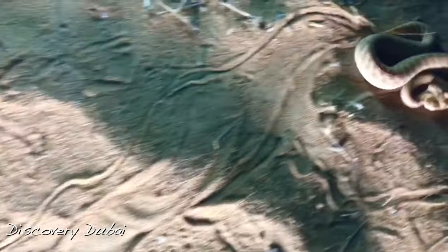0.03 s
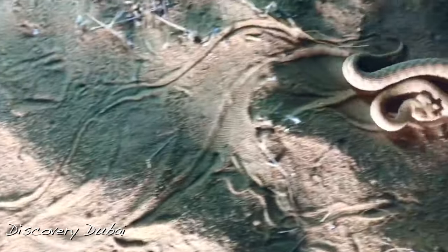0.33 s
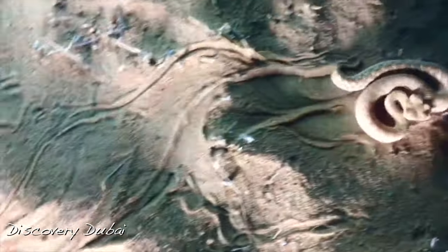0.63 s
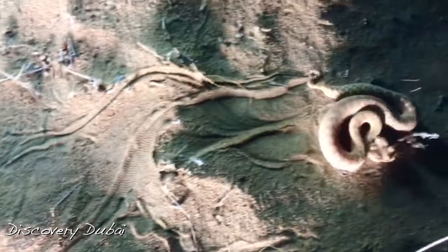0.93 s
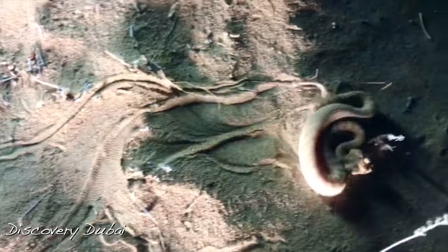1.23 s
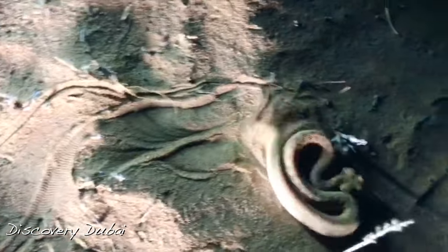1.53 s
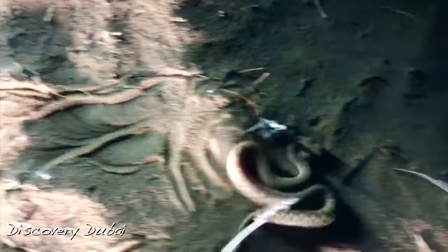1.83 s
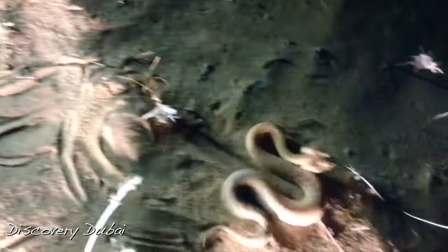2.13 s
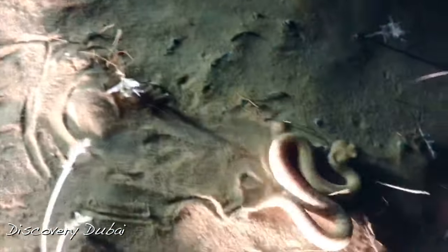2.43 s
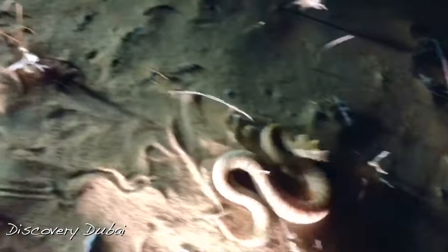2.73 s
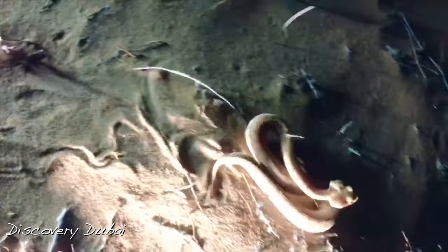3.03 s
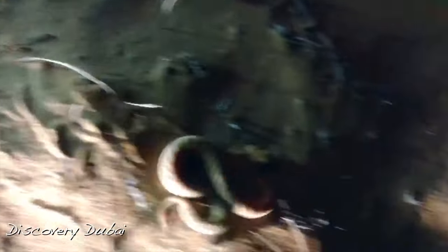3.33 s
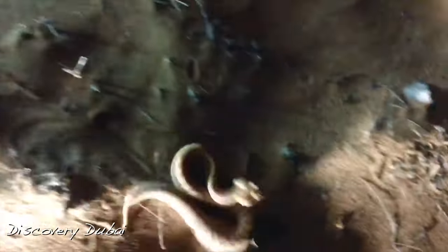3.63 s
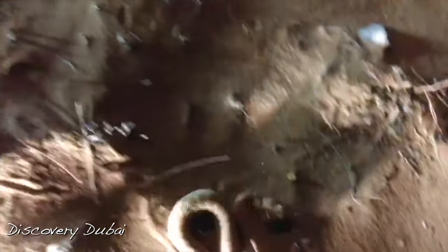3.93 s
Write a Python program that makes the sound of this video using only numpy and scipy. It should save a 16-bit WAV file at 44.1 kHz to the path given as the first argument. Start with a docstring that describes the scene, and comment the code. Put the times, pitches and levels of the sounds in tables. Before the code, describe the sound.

A snake rubs its scales together in a dry, hissing rasp, swelling softly through the first second. The loudest rasp comes at about 1.4 seconds, rising in pitch and lasting until 2.1. Shorter bursts follow and fade by 3.7, ending with a soft scuff. Grit ticks lightly near 2.3 and 2.9 seconds. A low outdoor rumble and a faint hum, like a distant engine, continue throughout.

```python
"""A viper rubs its keeled scales together as it coils on dry sand: long rasping swells, then short bursts.
The friction is a dense stream of tiny scale clicks over smooth sliding noise, shaped by moving resonances.
The loudest rasp opens low, so its pitch rises. A few grains of grit tick; one soft scuff comes near the end.
Under it lie a low outdoor rumble, faint air and a hum, as of a distant engine."""
import sys
import numpy as np
from scipy import signal
from scipy.fft import rfft, irfft, next_fast_len
from scipy.io import wavfile
from scipy.ndimage import map_coordinates

SR = 44100
rng = np.random.default_rng(int(sys.argv[2]) if len(sys.argv) > 2 else 0)


def waveform_to_disk(signal):
    """Save audio, clipped to [-1, 1], as 16-bit WAV at the path in sys.argv[1]."""
    frames = np.transpose(np.atleast_2d(signal))
    scaled = np.clip(frames, -1, 1) * 32767
    samples = np.round(scaled).astype(np.int16)
    wavfile.write(sys.argv[1], SR, samples)


N = 176400
T = np.arange(N) / SR


def amp(db):
    """Decibels to amplitude ratio."""
    return 10 ** (np.asarray(db) / 20)


def unit(x):
    """Normalisation to rms 1."""
    return x / np.sqrt(np.mean(x ** 2) + 1e-20)


def curves(rows):
    """Linear interpolation: one value per sample for each column after the time."""
    times, *columns = np.transpose(rows)
    return [np.interp(T, times, column) for column in columns]


def wobble(knots_per_s):
    """Smooth random modulation: a spline through Gaussian values."""
    return map_coordinates(rng.standard_normal(2048), [T * knots_per_s], mode="wrap")


def filtered(x, response):
    """Zero-phase filtering: the spectrum of x times a gain that depends on frequency."""
    size = next_fast_len(len(x) + 8192)
    return irfft(rfft(x, size) * response(np.fft.rfftfreq(size, 1 / SR)), size)[:len(x)]


def coloured(x, spectrum):
    """Spectral shaping by an envelope interpolated over log frequency, at rms 1."""
    freq_hz, gain_db = np.transpose(spectrum)
    return unit(filtered(x, lambda hz: amp(np.interp(np.log(hz + 1), np.log(freq_hz), gain_db))))


def band(x, centre_hz, octaves):
    """Band-pass filtering by a Gaussian in log frequency, at rms 1."""
    return unit(filtered(x, lambda hz: np.exp(-(np.log2((hz + 1) / centre_hz) / octaves) ** 2)))


def resonance(x, track, width_hz):
    """A moving resonance: a Lorentzian peak in decibels, or a dip where the gain is negative."""
    hz, frame_s, spectra = signal.stft(x, SR, nperseg=512)
    times, centres, gains = np.transpose(track)
    detuning_hz = hz[:, None] - np.interp(frame_s, times, centres)
    peak = 1 / (1 + (2 * detuning_hz / width_hz) ** 2)
    gain = amp(np.interp(frame_s, times, gains) * peak)
    return signal.istft(spectra * gain, SR, nperseg=512)[1][:N]


def tone(hz, rms_db):
    """A sinusoid whose phase is the integral of its frequency."""
    return np.sqrt(2) * amp(rms_db) * np.sin(2 * np.pi * (np.cumsum(hz) / SR + rng.random()))


def outdoors():
    """Broadband ambient noise: a low rumble that slowly brightens, and faint moving air."""
    # spectral envelopes: freq_hz, gain_db
    rumble_spectrum = [(20, -52), (35, -19), (52, 1), (65, 4), (90, 1.5), (130, -3.5), (200, -5.5),
                       (250, -9.5), (320, -12.5), (400, -18.5), (520, -29.5), (900, -46), (5000, -50)]
    air_spectrum = [(200, 9), (500, 6), (1000, 2), (2000, -13.5), (4000, -10), (8000, -16), (11500, -43)]
    # ambient levels: time_s, rumble_db, air_db
    levels = [(0, -45.5, -67.5), (.8, -48.5, -69.5), (1.6, -47, -62.5), (2.4, -48, -60.5),
              (3.4, -48.5, -66), (4, -50, -61)]
    # shelf on the rumble's upper part: time_s, gain_db
    brightness = [(0, -5), (1.5, 0.5), (2.8, 1), (3.5, 5.5)]
    split_hz = 220
    rumble_db, air_db = curves(levels)
    bright_db, = curves(brightness)
    rumble = coloured(rng.standard_normal(N), rumble_spectrum)
    deep = filtered(rumble, lambda hz: 1 / (1 + (hz / split_hz) ** 2))
    air = coloured(rng.standard_normal(N), air_spectrum)
    return amp(rumble_db) * (deep + amp(bright_db) * (rumble - deep)) + amp(air_db) * air


def distant_hum():
    """A line spectrum wavering in pitch and level: a fundamental, its octave and three weaker tones."""
    # fundamental: time_s, pitch_hz, level_db
    fundamental = [(0.06, 173, -51), (0.4, 174.4, -63.5), (1.27, 174.2, -54.5), (1.54, 177.2, -46),
                   (1.96, 176.9, -56.5), (2.36, 179.2, -50), (2.9, 179.5, -55), (3.9, 179.9, -50.5)]
    # weaker tones: start_s, pitch_hz, level_db
    weak_tones = [(0, 108, -60), (0, 234, -58), (2.9, 155, -54)]
    drift_hz, waver_db, rise_s = 2.048, 2.5, 0.17
    main_hz, main_db = curves(fundamental)
    main_hz = main_hz + drift_hz * wobble(12)
    hum = tone(main_hz, main_db + waver_db * wobble(9.1))
    hum += tone(2 * main_hz, main_db - 20)
    for start_s, pitch_hz, level_db in weak_tones:
        fade_in = np.clip((T - start_s) / rise_s, 0, 1)
        hum += fade_in * tone(pitch_hz + drift_hz * wobble(6), level_db + waver_db * wobble(5.28))
    return hum


def grit_ticks():
    """Impact noise: each contact is a band-limited impulse with a decaying, crumbling tail."""
    # ticks and small knocks: start_s, level_db, centre_hz, width_octaves, t60_s
    impacts = [(.211, -62, 9000, .5, .04), (2.138, -51, 700, .3, .03), (2.315, -38.5, 280, 2.1, .04),
               (2.892, -40.5, 1500, 1.2, .014), (2.892, -54, 9000, 1, .012), (3.786, -49, 750, 2.5, .018)]
    contact_db = 2  # energy of the impulse over that of its tail
    ticks = np.zeros(N)
    t = np.arange(SR // 10) / SR
    for start_s, level_db, centre_hz, octaves, t60_s in impacts:
        decay = np.exp(-np.log(1000) * t / t60_s)
        decay_norm = np.linalg.norm(decay)
        force, start = np.zeros(N), round(start_s * SR)
        force[start:][:len(t)] = decay * rng.standard_normal(len(t)) / decay_norm
        force[start] += amp(contact_db)
        tick = band(force, centre_hz, octaves)
        ticks += amp(level_db) * tick * decay_norm / np.linalg.norm(tick)
    return ticks


def rasp_opening_and_scuff():
    """Band noise in Gaussian swells: the low opening of the loudest rasp, and a late soft scuff."""
    # rasp opening, then scuff: middle_s, half_length_s, level_db, centre_hz, width_octaves
    swells = [(1.375, 0.089, -56, 1250, 0.41), (3.618, .035, -62.5, 1040, 0.22)]
    noise = np.zeros(N)
    for middle_s, half_s, level_db, centre_hz, octaves in swells:
        envelope = np.exp(-((T - middle_s) / half_s) ** 2)
        noise += amp(level_db) * band(rng.standard_normal(N), centre_hz, octaves) * envelope
    return noise


def scale_friction(spectrum):
    """Shot noise of tiny, uneven scale clicks over smooth sliding noise, shaped to a spectrum."""
    clicks_per_s, spread_db, smooth_share = 6000, 3, 0.38
    impulses = (rng.random(N) < clicks_per_s / SR) * rng.choice([-1, 1], N)
    clicks = unit(impulses * amp(spread_db * rng.standard_normal(N)))
    sliding = rng.standard_normal(N)
    return coloured(np.sqrt(1 - smooth_share) * clicks + np.sqrt(smooth_share) * sliding, spectrum)


def viper():
    """Stridulation: scales rub on scales in a rasp near 2 kHz, a treble and a fizz, fluttering as one."""
    # stroke envelopes: time_s, rasp_db, treble_db
    strokes = [(0.0, -69, -70), (0.14, -65, -69.5), (0.2, -60.5, -58), (0.38, -56.5, -56),
               (0.66, -55, -55.5), (0.96, -57.5, -62.5), (1.04, -61.5, -66.5), (1.08, -68, -70.5),
               (1.22, -59.5, -62.5), (1.26, -56.5, -58), (1.33, -54, -57.5), (1.42, -41.5, -50),
               (1.49, -43.5, -52.5), (1.56, -48, -56), (1.65, -45, -54.5), (1.87, -51, -55),
               (2.0, -46, -52), (2.08, -50, -48.5), (2.11, -54.5, -50), (2.13, -77, -75), (2.19, -72, -77),
               (2.25, -51, -58.5), (2.36, -46, -53.5), (2.44, -54, -55.5), (2.53, -54.5, -58),
               (2.56, -58.5, -64), (2.6, -48.5, -49), (2.64, -52.5, -51), (2.66, -60, -56.5),
               (2.71, -53.5, -48), (2.76, -62.5, -60), (2.81, -76, -71), (2.89, -66.5, -72),
               (2.95, -52, -57.5), (3.07, -50, -54.5), (3.16, -54, -56), (3.2, -59.5, -60.5),
               (3.26, -53.5, -57), (3.32, -67, -76), (3.37, -57, -58), (3.44, -74.5, -84), (3.52, -75, -81),
               (3.57, -59.5, -64.67), (3.62, -59.5, -82), (3.7, -69.5, -83), (4.0, -68.5, -81)]
    # fizz envelope: time_s, level_db
    fizz_levels = [(0.0, -77), (0.15, -83), (0.38, -66), (0.6, -66.5), (0.92, -69.5), (1.1, -81),
                   (1.31, -66.5), (1.45, -65), (1.6, -75), (1.84, -67.5), (1.99, -56), (2.1, -65),
                   (2.14, -77.5), (2.45, -70.5), (2.61, -63.5), (2.66, -71), (2.86, -79), (2.96, -70.5),
                   (3.13, -72), (3.31, -78), (3.37, -72), (3.46, -95), (3.67, -73), (3.72, -97)]
    # spectral envelopes of the friction: freq_hz, gain_db
    rasp_spectrum = [(250, -35), (500, -19.5), (800, -14), (1200, -6.5), (1600, -2.5), (2000, 0.5),
                     (2350, -4), (2750, -6.5), (3200, -9.5), (4000, -19.5), (6000, -44)]
    treble_spectrum = [(1200, -29), (2300, -10.5), (3200, -0.5), (4400, -2.5), (5100, -5.5), (6000, -5),
                       (6700, -8.5), (7400, -13), (9000, -15), (12000, -27)]
    fizz_spectrum = [(4000, -21), (6500, -19), (8000, -1.5), (9500, 5.5), (10500, 5), (11500, 9),
                     (12300, -7)]
    # rasp resonance, shifting as the coils change shape: time_s, centre_hz, gain_db
    rasp_peak = [(.2, 2320, 3), (.42, 2360, 8), (.7, 2380, 7), (1.1, 2660, 3), (1.4, 2050, -1),
                 (1.55, 2820, 5), (1.8, 2830, 8.5), (1.9, 2940, 2), (2.05, 2680, 5.5), (2.33, 2900, 5.5),
                 (2.55, 2700, 2), (2.98, 2920, 7), (3.1, 2520, 6), (3.4, 2560, -5)]
    # treble resonance: time_s, centre_hz, gain_db
    treble_peak = [(.25, 3900, 4.5), (.95, 3900, 7.5), (1.44, 4100, 6), (1.7, 3620, 7), (2.05, 3500, 8),
                   (2.3, 3280, -2), (2.5, 4370, 8.5), (2.6, 4350, 5), (2.71, 3600, 6), (2.97, 3200, 0),
                   (3.1, 3600, 4.5), (3.24, 4500, 4), (3.37, 3420, 4), (3.57, 3620, 10)]
    # spectral dip between rasp and treble: time_s, centre_hz, gain_db
    hollow = [(.25, 2930, -4.5), (.75, 3450, -0.5), (1.33, 2960, -1), (1.44, 3420, -10), (1.6, 3300, 0.5),
              (1.98, 3220, -3), (2.28, 3300, -2.5), (2.71, 2900, -2), (2.97, 3900, -5), (3.1, 3900, -0.5)]
    rasp_lift_db, treble_lift_db, flutter_db = 1.82, 0.64, 0.69
    rasp_db, treble_db = curves(strokes)
    fizz_db, = curves(fizz_levels)
    rasp = unit(resonance(scale_friction(rasp_spectrum), rasp_peak, width_hz=720))
    treble = unit(resonance(scale_friction(treble_spectrum), treble_peak, width_hz=800))
    rub = amp(rasp_db + rasp_lift_db) * rasp + amp(treble_db + treble_lift_db) * treble
    fizz = amp(fizz_db) * scale_friction(fizz_spectrum)
    flutter = amp(flutter_db * wobble(knots_per_s=90))
    return (resonance(rub, hollow, width_hz=350) + fizz) * flutter


def scene():
    """Superposition of the viper, the grit and the background in one channel."""
    return (viper() + grit_ticks() + rasp_opening_and_scuff() + outdoors() + distant_hum())[None]


def record(dry):
    """Band limiting by an ideal low-pass filter."""
    cutoff_hz = 12150
    return filtered(dry[0], lambda hz: hz < cutoff_hz)[None]


dry = scene()
out = record(dry)
waveform_to_disk(out)
```